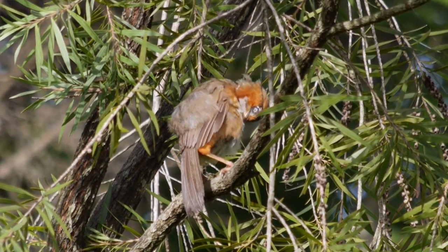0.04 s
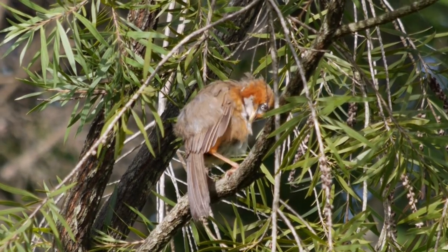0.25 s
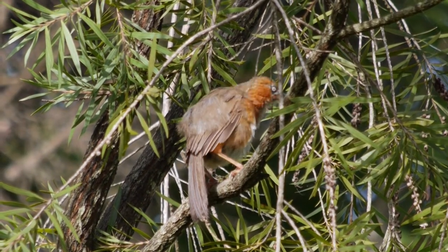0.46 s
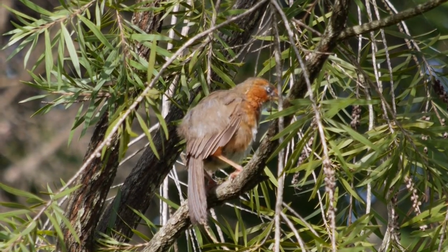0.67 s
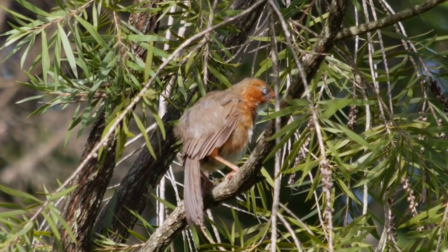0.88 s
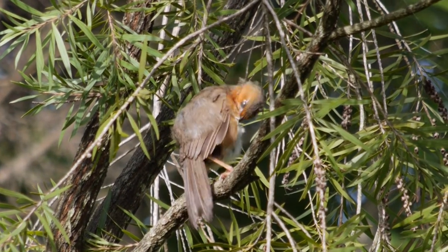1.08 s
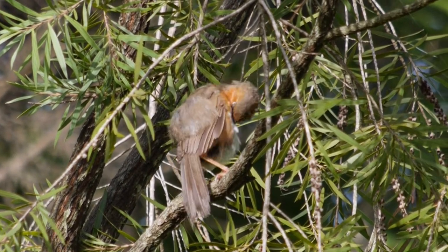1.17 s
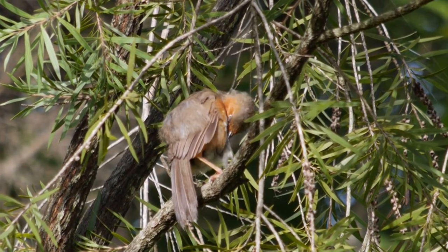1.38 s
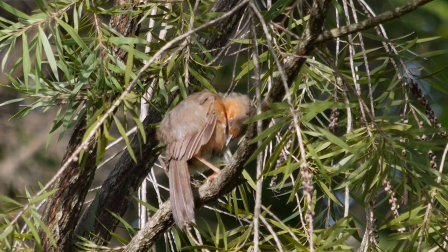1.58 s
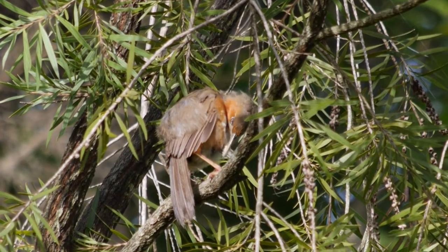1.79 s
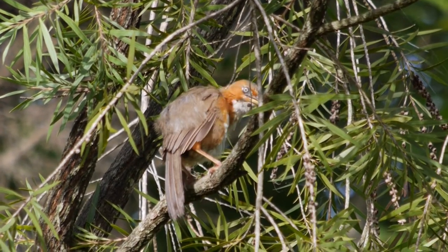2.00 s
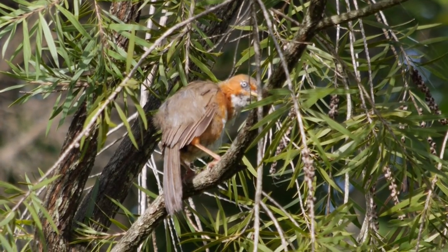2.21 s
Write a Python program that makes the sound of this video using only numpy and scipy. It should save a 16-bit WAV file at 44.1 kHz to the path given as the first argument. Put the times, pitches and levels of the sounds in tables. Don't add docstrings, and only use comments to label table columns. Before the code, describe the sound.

Bird calls in leafy trees, about two seconds. From 0 to 0.5, rapid warbles and thin, buzzy high whistles some way off. At 0.55 to 0.8 a near babbler gives three sharp notes, then an arching call and fast chatter sinking in pitch until 1.25. Fainter trills and clear slides follow, a tiny leaf flick at 1.6, one soft note near 2.1. Hiss, faint motor hum and distant dove coos beneath.

```python
import sys
import numpy as np
from scipy import signal
from scipy.io import wavfile
from scipy.ndimage import uniform_filter1d

SR = 44100
rng = np.random.default_rng(int(sys.argv[2]) if len(sys.argv) > 2 else 0)


def to_linear_factor(level_db):
    exponent = np.asarray(level_db, float) / 20
    return 10 ** exponent


def dump_mix(stems):
    frames = np.atleast_2d(stems).T
    limited = np.clip(frames, -1, 1)
    pcm = np.round(limited * 32767).astype(np.int16)
    wavfile.write(sys.argv[1], SR, pcm)


N = 99225


def evened(x):
    return x / np.sqrt(np.mean(x ** 2) + 1e-20)


def read(points, hz):
    f, value = np.transpose(points)
    return np.interp(np.log(hz + 1), np.log(f + 1), value)


def drift(n, span):
    return evened(uniform_filter1d(uniform_filter1d(rng.standard_normal(n), span), span))


def add(mix, s, sound, pan_db):
    at = round(s * SR)
    first = max(at, 0)
    sound = sound[max(-at, 0):][:N - first]
    mix[:, first:first + len(sound)] += sound * to_linear_factor(np.array([[pan_db / 2], [-pan_db / 2]]))


def curve(points, smooth=150):
    p = np.array(points, float)
    t = np.arange(p[0, 0], p[-1, 0], 1 / SR)
    columns = [np.interp(t, p[:, 0], c) for c in p.T[1:]]
    return [t] + [uniform_filter1d(c, smooth, mode="nearest") for c in columns]


def voice(hz, db, overtones_db, throat, shake, flutter_db, buzz=0):
    # freq_hz, gain_db
    throat_gain = [(1000, -24), (2000, -21), (3300, -0.5), (4000, -3.5), (4700, -6), (6000, -22),
                   (9500, -20), (13000, -25), (15500, -62)]
    grain_db = 3
    n = len(hz)
    buzzing = np.sin(2 * np.pi * np.cumsum(170 * (1 + 0.2 * drift(n, 200))) / SR)
    hz = hz * (1 + shake * drift(n, 60) + buzz * buzzing)
    turns = 2 * np.pi * np.cumsum(hz) / SR
    wave = np.zeros(n)
    for k, overtone_db in enumerate(overtones_db, 1):
        level_db = overtone_db + throat * read(throat_gain, k * hz)
        if k == 2:
            level_db = level_db - throat * 11 * np.clip((hz - 2300) / 400, 0, 1)
        if k > 2:
            level_db = level_db + grain_db * drift(n, 40)
        wave += to_linear_factor(level_db) * (k * hz < SR * .4) * np.sin(k * turns)
    to_end = np.minimum(np.arange(n), n - np.arange(n))
    edge = np.clip(to_end / (0.0021 * SR), 0, 1)
    return np.sqrt(2) * wave * edge * to_linear_factor(db + flutter_db * drift(n, 90))


def trees(x, direct_db, echo_db, tail_db, t60):
    # delay_s, level_db
    trunks = [(.031, -12.5)]
    n = SR * 3 // 4
    taps = np.zeros((2, n))
    slots = np.arange(200, n - 20, 20)
    at = slots + rng.integers(0, 20, (2, len(slots)))
    np.put_along_axis(taps, at, rng.choice([-1., 1.], at.shape), 1)
    taps = (taps + 0.42 * taps[::-1]) * to_linear_factor(-60 * np.arange(n) / SR / t60)
    taps *= to_linear_factor(tail_db) / np.linalg.norm(taps[0])
    for s, db in trunks:
        start = round(s * SR)
        bark = rng.standard_normal(40) + 0.76 * rng.standard_normal((2, 40))
        taps[:, start:start + 40] += to_linear_factor(db + echo_db) * bark / np.sqrt(40)
    leaves = rng.standard_normal((2, 400)) * to_linear_factor(-np.arange(400) / 15)
    leaves = np.diff(leaves, 2) * to_linear_factor([[-24], [-28]])
    near = x + signal.fftconvolve(x, leaves, axes=1)[:, :N]
    return to_linear_factor(direct_db) * near + signal.fftconvolve(x, taps, axes=1)[:, :N]


def air():
    # freq_hz, density_db
    spectrum = [(30, -4), (300, -1), (1960, -4), (5900, 1), (8500, -15.5), (11000, -27.5), (15000, -24),
                (15700, -43)]
    # freq_hz, share
    likeness = [(30, 0.42), (120, 0.68), (700, 0.043), (2500, 0.69), (5500, 0.6), (15000, 0.55)]
    level_db, patchy_db = -58.5 + 1.5, 3.5
    frames, hz = N // 256 + 5, np.fft.rfftfreq(1024, 1 / SR)
    a, b, c, d, patches = rng.standard_normal((frames, 513, 5)).T
    patches = evened(uniform_filter1d(uniform_filter1d(patches, 14, 0), 12, 1))
    patches = patches * np.clip(hz / 3000, .2, 1)[:, None]
    same = np.clip(read(likeness, hz), -1, 1)[:, None]
    left = a + 1j * b
    right = same * left + np.sqrt(1 - same ** 2) * (c + 1j * d)
    z = np.array([left, right]) * to_linear_factor(read(spectrum, hz)[:, None] + patchy_db * patches)
    return to_linear_factor(level_db) * evened(signal.istft(z, nperseg=1024, noverlap=768)[1][:, :N])


def hum():
    # middle_s, length_s
    swells = [
        (0.02, 0.12),
        (0.548, 0.062),
        (0.786, 0.21),
        (1.046, 0.19),
        (1.637, 0.044),
        (1.9, 0.11),
        (2.063, 0.13),
        (2.187, 0.048),
    ]
    t = np.arange(N) / SR
    swelling = sum(np.exp(-(2 * (t - s) / length) ** 4) for s, length in swells)
    level = (to_linear_factor(-78) + to_linear_factor(-65.5) * swelling) * to_linear_factor(3.1 * drift(N, 700))
    hz = 116.5 * (1 + 0.0098 * drift(N, 3000))
    return np.sqrt(2) * level * np.sin(2 * np.pi * np.cumsum(hz) / SR)


def flock(first, last):
    # start_s, length_s, level_db, start_pitch_hz, end_pitch_hz
    warbles = [(-.04, 0.065, -48, 2487, 2680), (0.128, 0.094, -54, 2343, 2200),
               (0.227, 0.1, -51.5, 3037, 3170), (0.392, 0.098, -47, 3235, 2700),
               (1.238, 0.059, -54, 3294, 3400), (1.498, 0.088, -56.5, 2367, 2030),
               (1.449, 0.19, -53.5, 3504, 3500), (1.661, 0.15, -53, 3825, 3600),
               (1.764, 0.12, -53.5, 3495, 2750), (1.974, 0.088, -58.5, 3124, 3360),
               (0.119, 0.049, -64, 7830, 7000), (1.736, 0.28, -67, 8320, 8300)]
    # swing_rate_hz, swing_share of pitch, third_overtone_db, unevenness_share
    swings = [(69, 0.14, -30, 0.094), (66.4, .2, -21, 0.044), (40.1, 0.305, -21, 0.098),
              (69.5, 0.18, -20.5, 0.035), (80.4, 0.167, -25, 0.12), (55.9, .25, -27, 0.12),
              (111.2, 0.14, -49, 0.07), (124.5, 0.14, -32, 0.055), (109.3, .25, -41, 0.047),
              (91, 0.094, -40, .1), (91.7, 0.15, -40, 0.09), (99, 0.097, -40, 0.086)]
    out = np.zeros((2, N))
    for warble, wobble in list(zip(warbles, swings))[first:last]:
        s, length, db, hz0, hz1 = warble
        rate, share, third_db, uneven = wobble
        u = np.arange(0, 1, 1 / (length * SR))
        turn = 2 * np.pi * np.cumsum(rate * (1 + uneven * drift(len(u), 300))) / SR - np.pi / 2
        swing = np.arcsin(.95 * np.sin(turn + 0.81 * np.sin(turn))) / 1.18
        hz = (hz0 + (hz1 - hz0) * u) * (1 + share * swing)
        db = db - 5 * (2 * u - 1) ** 4 + 2 * drift(len(u), 900)
        sound = voice(hz, db, [0, -24, third_db], 0, 0.013, 1.38)
        add(out, s, sound, 3.6 if s < .5 else 1.2)
    return out


def dove():
    # time_s, pitch_hz, level_db
    coos = [
        [(0, 346, -67.5), (.04, 350, -78)],
        [(.07, 362, -71), (.11, 393, -70), (.19, 365, -76)],
        [(.51, 270, -73), (.545, 280, -68.5), (.58, 290, -75)],
        [(.705, 243, -74), (.74, 268, -67.5), (.85, 297, -78)],
        [(1.15, 286, -81), (1.4, 299.6, -75)],
    ]
    out = np.zeros((2, N))
    for points in coos:
        t, hz, db = curve(points, 600)
        swell = np.sin(np.linspace(0, np.pi, len(t))) ** 0.16
        add(out, t[0], voice(hz, db, [0], 0, 0.0034, 0.84) * swell, 0)
    return out


def whistlers(early):
    # time_s, pitch_hz, level_db
    slides = [
        [(.150, 5925, -50), (.195, 5120, -46.5), (.225, 5350, -52.5), (.258, 6010, -45.5), (.30, 6380, -60),
         (.345, 6100, -54)],
        [(.362, 6880, -58), (.385, 6000, -49.5), (.405, 5800, -49), (.435, 5670, -60)],
        [(.438, 6090, -51), (.484, 6960, -49.5), (.51, 6200, -68)],
        [(.60, 8380, -60.5), (.68, 7830, -55.5), (.73, 6740, -50), (.76, 5750, -48.5), (.797, 5510, -55.5)],
        [(.845, 5730, -54), (.88, 5840, -47), (.89, 5850, -62), (.903, 6090, -50), (.96, 5990, -53),
         (1.0, 6150, -51.5), (1.035, 6530, -55)],
        [(1.155, 6500, -57.5), (1.212, 5880, -54.5)],
        [(1.21, 3880, -51), (1.285, 5202, -47), (1.315, 5900, -52.5), (1.37, 5940, -66)],
        [(1.604, 6170, -69), (1.618, 4970, -54), (1.635, 4350, -61), (1.705, 5060, -50), (1.735, 4350, -54.5)],
        [(1.785, 4700, -60), (1.815, 5150, -45.5), (1.84, 6540, -70)],
    ]
    # time_s, pitch_hz, level_db
    faint = [
        [(.308, 3000, -73), (.318, 2110, -60.5), (.329, 1034, -58.5)],
        [(1.452, 5100, -66), (1.461, 5100, -52), (1.47, 5050, -73)],
        [(1.483, 5300, -73), (1.527, 5150, -65)],
        [(1.555, 5200, -71), (1.572, 5300, -65)],
        [(1.72, 6500, -69), (1.745, 6650, -58), (1.765, 6600, -77.5)],
        [(1.742, 5950, -67), (1.785, 5850, -67)],
        [(2.19, 1520, -63), (2.225, 1520, -75)],
        [(1.492, 3870, -63), (1.505, 5520, -62), (1.535, 6050, -64)],
        [(1.53, 8300, -97), (1.575, 6600, -63), (1.6, 8030, -62)],
        [(1.853, 6340, -52.5), (1.866, 4800, -67), (1.885, 7000, -49.5)],
        [(2.06, 5510, -64), (2.1, 5330, -66), (2.2, 4640, -66)],
    ]
    out = np.zeros((2, N))
    for points, pan_db in [(p, -3) for p in slides] + [(p, .8) for p in faint]:
        if (points[0][0] < 1.3) != early:
            continue
        t, hz, db = curve(points, 200)
        buzz = .03 * (hz > 4300) * early
        add(out, t[0], voice(hz, db, [0], 0, .008 + .01 * early, 2.5 + 1.5 * early, buzz=buzz), pan_db)
    return np.array([np.roll(out[0], 1), out[1]])


def babbler():
    # time_s, pitch_hz, effort_db
    note_a = [(.555, 3460, -45), (.560, 3990, -39), (.568, 4070, -36.5), (.578, 3330, -38),
              (.588, 3720, -34), (.597, 3275, -27), (.609, 3094, -42), (.616, 2480, -48)]
    note_b = [(.648, 1924, -36.5), (.658, 2924, -42.5), (.668, 3510, -29.5), (.688, 3595, -46),
              (.695, 3506, -25.5), (.702, 2835, -37.5), (.711, 3352, -35.5), (.724, 3495, -43),
              (.76, 3564, -51)]
    note_c = [(.768, 1320, -46), (.778, 1806, -37.5), (.788, 2280, -34.5), (.797, 2070, -46)]
    note_d = [(2.066, 2086, -51), (2.077, 3467, -50), (2.088, 2865, -44.5), (2.098, 3150, -43),
              (2.114, 3070, -74), (2.135, 2690, -57)]
    # time_s, pitch_hz, effort_db
    arch = [(.826, 1275, -46), (.836, 1875, -36), (.866, 2914, -38.5), (.884, 3196, -30),
            (.898, 3103, -40.5), (.918, 1860, -30)]
    # time_s, top_hz, foot_hz, effort_db
    chatter = [(.918, 3217, 1935, -31.5), (1.0, 3134, 1922, -34.5), (1.05, 2768, 1835, -34.5),
               (1.1, 2249, 1645, -37.5), (1.16, 1740, 1382, -40.5), (1.235, 1337, 1136, -46.5)]
    feet = [.918, .951, .984, 1.019, 1.052, 1.086, 1.125, 1.161, 1.197, 1.228, 1.26]
    partials_db = [-1, -3, -11.5, -8, -16.5]
    quick_rise, peaked, sweep_dip_db = .45, 2.0, 5
    out = np.zeros((2, N))
    for note, pan_db in ((note_a, 1.6), (note_b, 2.1), (note_c, .6), (note_d, 3.4)):
        t, hz, db = curve(note)
        add(out, t[0], voice(hz, db, partials_db, 1, 0.0013, 1.86), pan_db)
    t0, hz0, db0 = curve(arch)
    t, top, foot, db = curve(chatter)
    swing = np.interp(t, feet, np.arange(len(feet)))
    swing = swing + quick_rise * np.sin(np.pi * swing) ** 2 / np.pi
    hz = foot + (top - foot) * np.abs(np.sin(np.pi * swing)) ** peaked
    db = db - sweep_dip_db * np.abs(np.gradient(hz)) / 5
    pitch = uniform_filter1d(np.r_[hz0, hz], 60)
    add(out, t0[0], voice(pitch, np.r_[db0, db], partials_db, 1, .012, 3), 1.7)
    return out


def leaf():
    # middle_s, level_db, length_s
    flick = (1.62, -69, .014)
    s, db, length = flick
    out = np.zeros((2, N))
    t = np.arange(0, 2 * length, 1 / SR)
    rustle = evened(np.diff(rng.standard_normal(len(t) + 2), 2))
    add(out, s - length, to_linear_factor(db) * rustle * np.sin(np.pi * t / length / 2) ** 2, 3)
    return out


def scene():
    far = trees(flock(3, 4), -2.5, -4, -3.5, .14)
    far += trees(flock(0, 3) + flock(9, None), -5, -2, -1.5, .14)
    far += trees(flock(4, 9), -3, -4, -3, .14)
    far += trees(whistlers(True), -3, -2, -3.5, .35)
    far += trees(whistlers(False), 0, -5, -8, .35)
    near = trees(babbler(), 0, -2.5, -0.77, 0.21)
    return near + far + air() + hum() + dove() + leaf()


def roll_off(x):
    return signal.sosfilt(signal.butter(12, 15700, fs=SR, output="sos"), x)


def record(dry):
    return roll_off(dry)


dry = scene()
out = record(dry)
dump_mix(out)
```